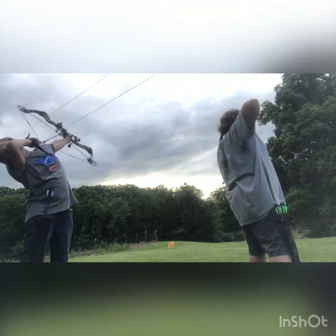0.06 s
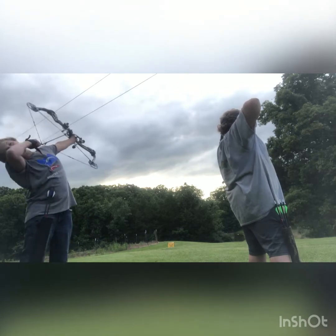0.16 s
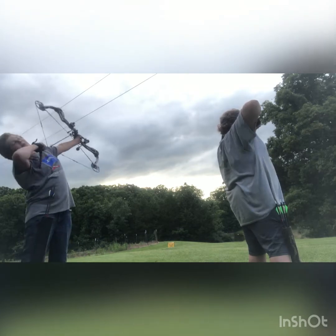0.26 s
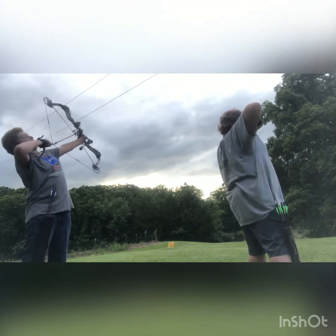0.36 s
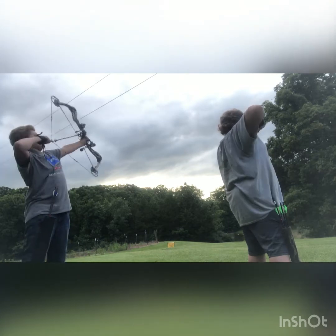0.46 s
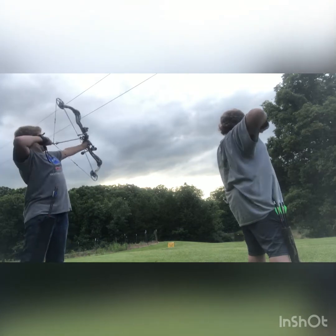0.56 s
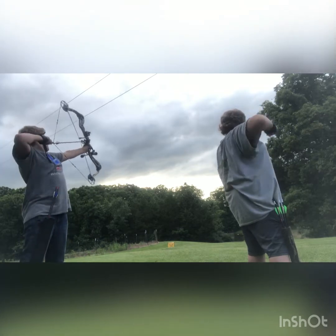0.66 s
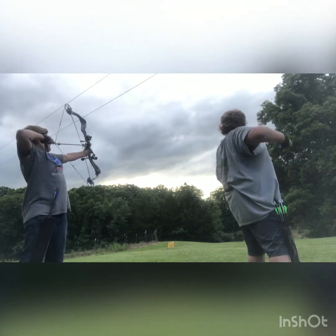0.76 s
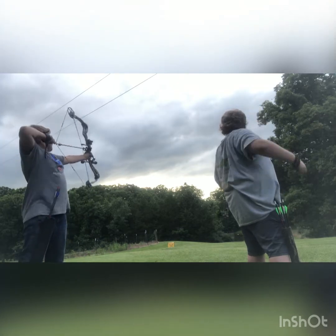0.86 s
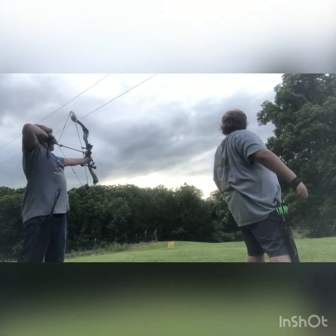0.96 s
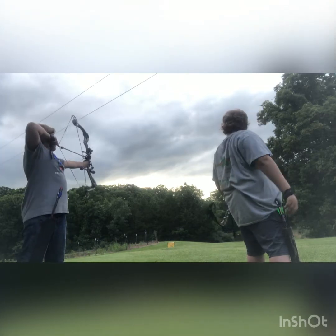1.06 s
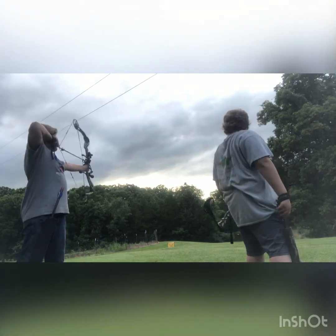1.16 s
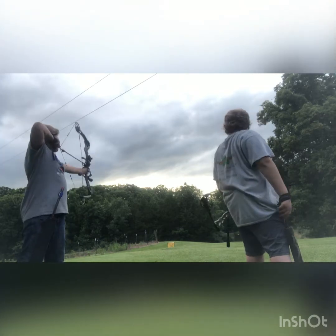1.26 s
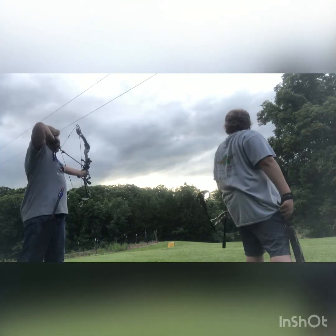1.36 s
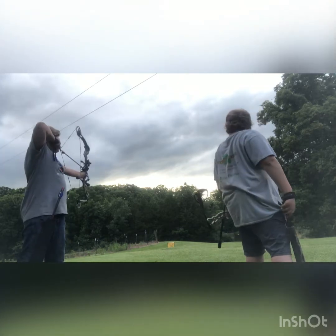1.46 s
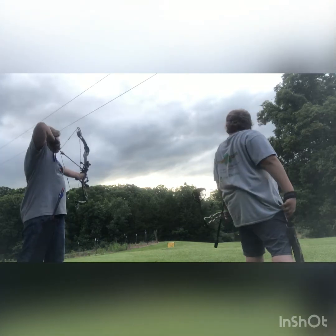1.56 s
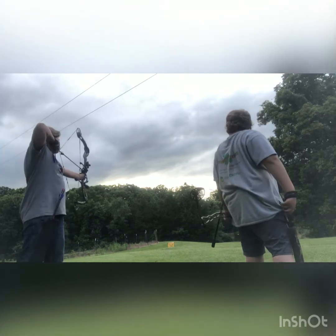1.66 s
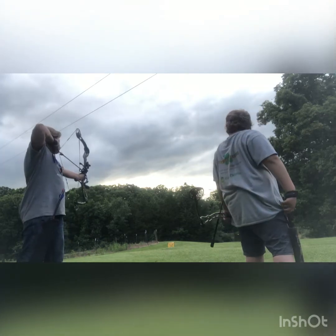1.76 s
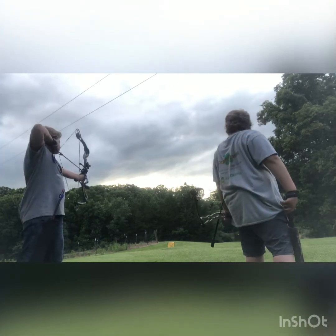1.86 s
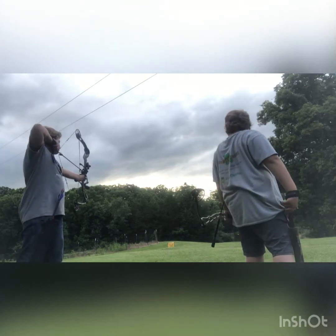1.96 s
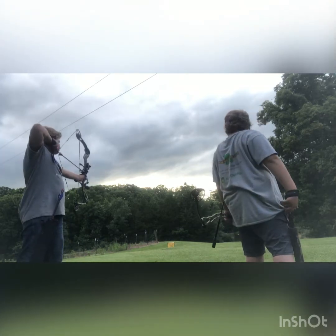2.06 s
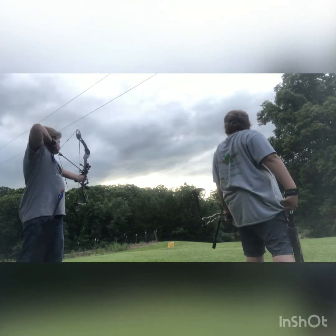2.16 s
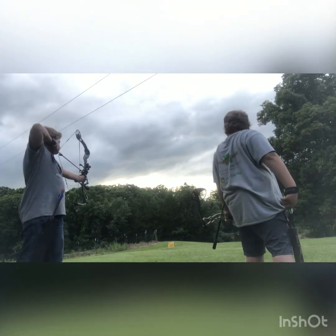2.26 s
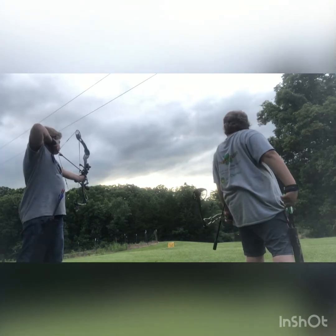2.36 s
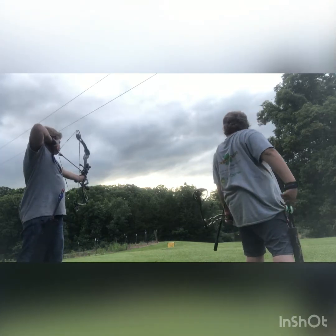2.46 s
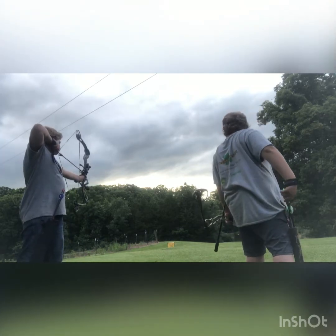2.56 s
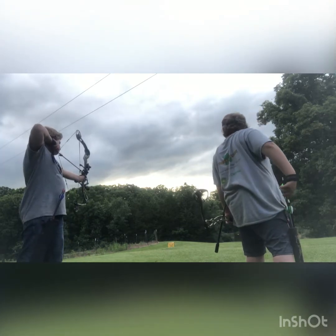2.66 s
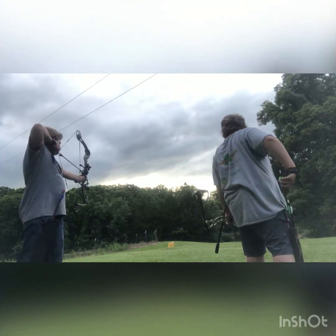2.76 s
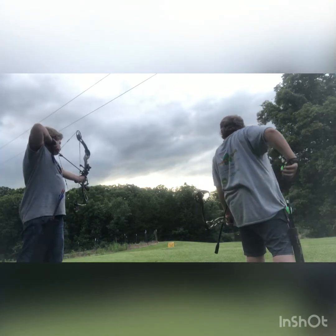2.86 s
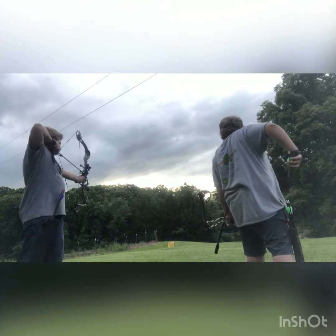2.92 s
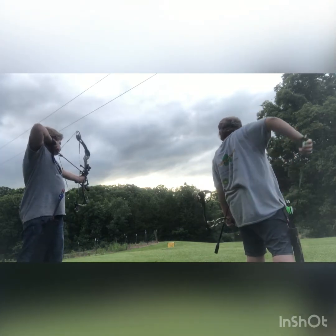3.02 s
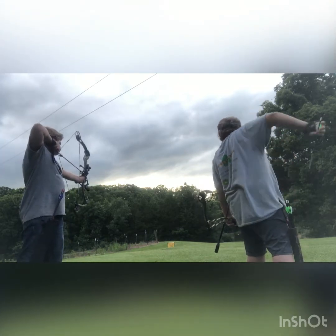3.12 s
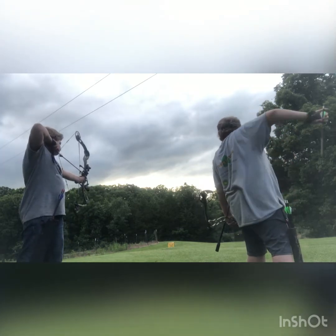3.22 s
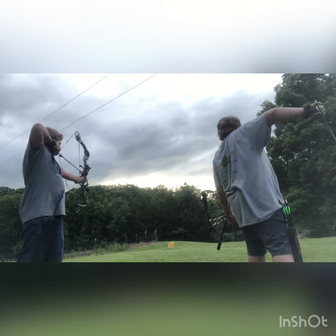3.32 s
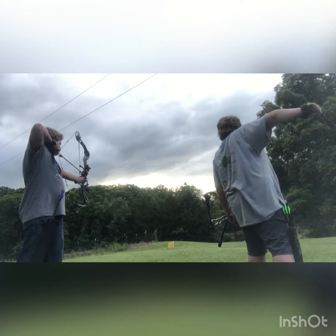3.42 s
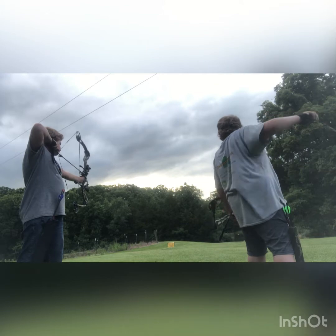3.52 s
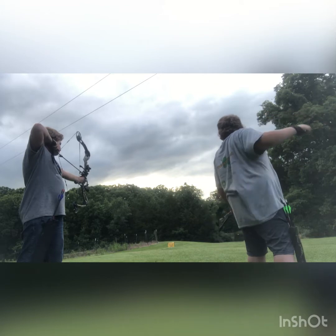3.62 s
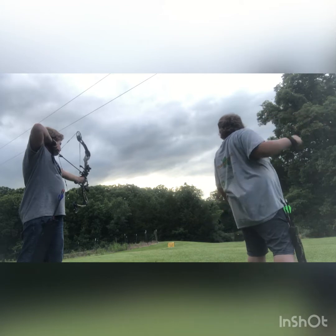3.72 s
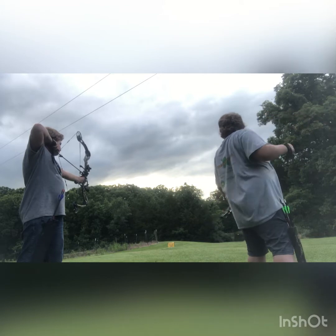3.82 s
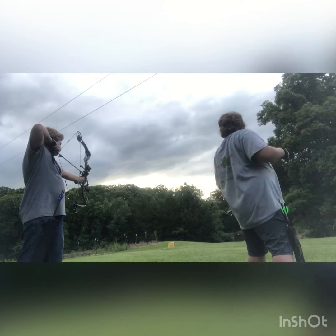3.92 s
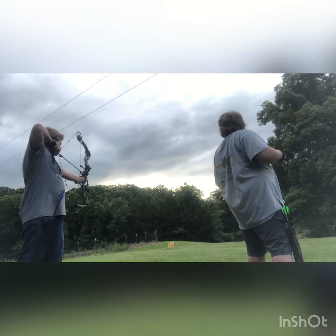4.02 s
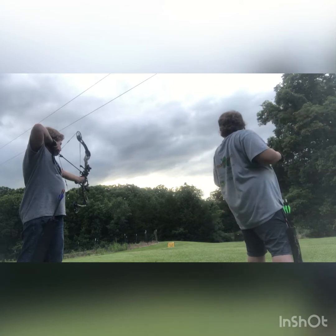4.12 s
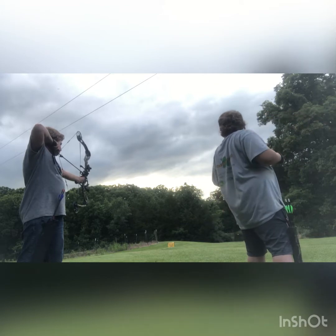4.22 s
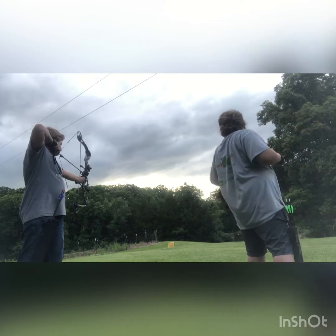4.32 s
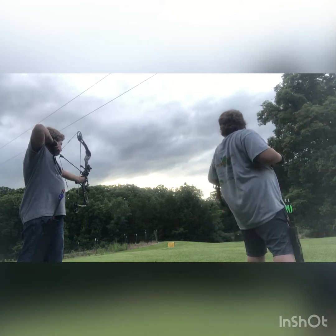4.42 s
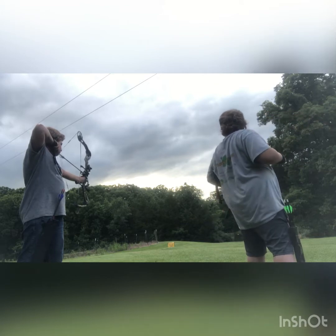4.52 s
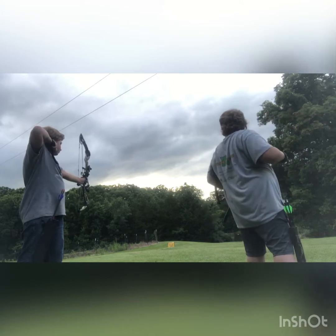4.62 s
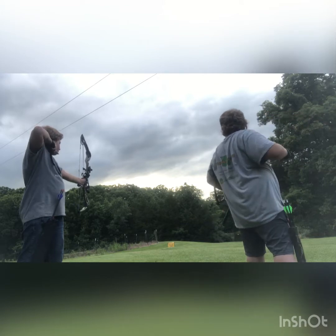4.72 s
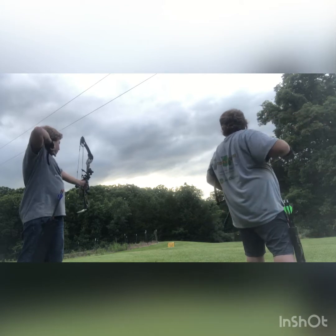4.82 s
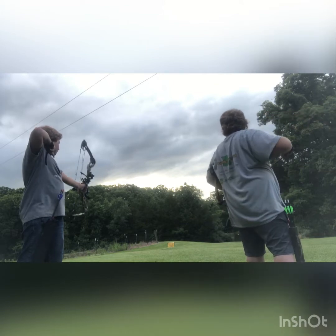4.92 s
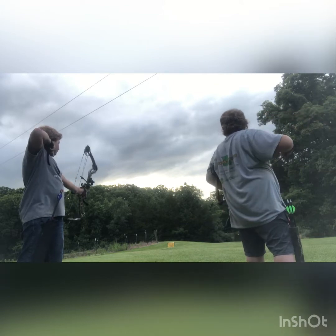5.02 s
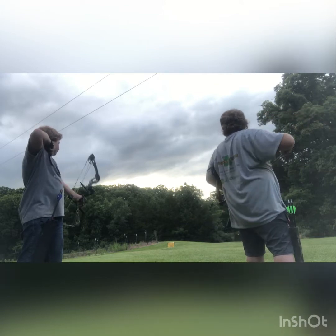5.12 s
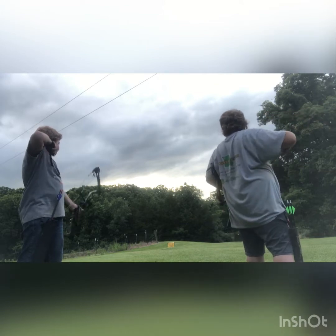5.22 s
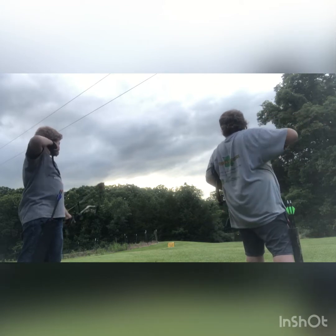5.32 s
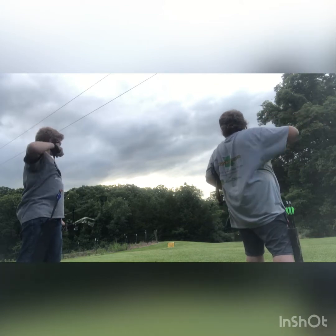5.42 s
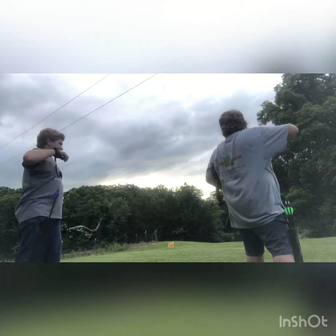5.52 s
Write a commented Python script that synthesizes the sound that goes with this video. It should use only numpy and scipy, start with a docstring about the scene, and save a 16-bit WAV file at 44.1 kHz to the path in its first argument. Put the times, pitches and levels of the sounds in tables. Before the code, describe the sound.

Very faint wind and an insect haze run throughout on an open field. At about 0.1 seconds a nearby compound bow releases with a thump and short ring. At 0.5 seconds the arrow hits a distant target with a loud crack and low thud, echoing lightly off trees. Hollow arrow shafts rattle around 1.1 seconds, followed by scattered ticks and a faint sleeve rustle. At 2.1 seconds a bouncing knock leaves a bow humming briefly. From 2.3 to 2.9 seconds an arrow scrapes softly out of a quiver, with clicks near 2.4 and 3.1. Faint birds whistle and chirp between 2.1 and 3.3 seconds. After a lull, a second bow fires with a sharp snap at 4.6 seconds. Its arrow strikes at 4.9 with a crack and heavy thump, the loudest sound. Light clicks and faint chirps follow until about 5.5 seconds.

```python
"""Two compound bows on a mown field

Each release ticks, slams the cams into their stops and rings the frame. A third of a second later the
arrow cracks into the far target, a thump follows along the ground and the tree line answers. Between
the shots arrows rattle and one scrapes out of a quiver. Birds whistle over faint wind and insects."""
import sys
import numpy as np
from scipy import signal
from scipy.fft import rfft, irfft, next_fast_len
from scipy.io import wavfile
from scipy.ndimage import map_coordinates

SR = 44100
rng = np.random.default_rng(int(sys.argv[2]) if len(sys.argv) > 2 else 0)


def persist_wave(psi):
    """Save psi, clipped to +-1, as 16-bit WAV."""
    counts = np.round(np.clip(psi, -1, 1) * 32767).astype(np.int16)
    wavfile.write(sys.argv[1], SR, np.atleast_2d(counts).T)


N = 246078
T = np.arange(N) / SR

# Target thump. Each row: frequency in Hz, density in dB.
THUMP_SPECTRUM = [(20, -56), (50, -24), (85, -28), (140, -10), (205, 0.5), (280, 0), (370, 1), (470, 1),
                  (600, -8), (800, -22), (1200, -49), (2500, -96.5)]


def amp(db):
    """Decibels to gain."""
    return 10 ** (np.asarray(db) / 20)


def unit(x):
    """Scale to rms 1."""
    return x / np.sqrt(np.mean(x ** 2) + 1e-20)


def along(points, hz):
    """Interpolate (Hz, value) points on a log frequency axis."""
    knots_hz, values = np.transpose(points)
    return np.interp(np.log(hz + 1), np.log(knots_hz), values)


def filtered(x, response):
    """Filter x by response(hz)."""
    size = next_fast_len(len(x) + 8192)
    return irfft(rfft(x, size) * response(np.fft.rfftfreq(size, 1 / SR)), size)[:len(x)]


def noise(spectrum, size=N, tilt_db=0):
    """Coloured noise of rms 1, tilted by tilt_db per octave above 500 Hz."""
    def response(hz):
        return amp(along(spectrum, hz) + tilt_db * np.log2(np.maximum(hz, 500) / 4000))
    return unit(filtered(rng.standard_normal(size), response))


def wobble(rate_hz):
    """Smooth random curve, rate_hz knots a second."""
    return map_coordinates(rng.standard_normal(int(N * rate_hz / SR) + 4), [T * rate_hz])


def fade(t, t60_s):
    """Exponential decay from t = 0."""
    return np.exp(-np.log(1000) * np.maximum(t, 0) / t60_s)


def onset(t, rise_s):
    """Exponential rise from 0 towards 1."""
    return 1 - np.exp(-t / rise_s)


def swell(start_s, length_s, attack_s, release_s):
    """Trapezoid envelope."""
    return np.clip(np.minimum((T - start_s) / attack_s, (start_s + length_s - T) / release_s), 0, 1)


def add(out, start_s, x):
    """Mix x into out from start_s."""
    start = round(start_s * SR)
    out[start:start + len(x)] += x[:N - start]


def ring(modes, rise_s, scatter_db, tilt_db=0):
    """Damped modes (Hz, dB, t60 s), struck with slightly random strengths, tilted per octave."""
    t = T[:SR]
    tones = np.zeros(SR)
    for k, (hz, db, t60_s) in enumerate(modes):
        gain = amp(db + scatter_db * rng.standard_normal() + tilt_db * np.log2(hz / modes[0][0]))
        tones += (-1) ** k * gain * fade(t, t60_s) * np.sin(2 * np.pi * hz * t)
    return tones * onset(t, rise_s)


def air():
    """One breeze drives a low rumble and a hiss of leaves, under an even haze of insects."""
    # Each row: frequency in Hz, density in dB.
    wind_spectrum = [(15, -80), (25, -31.5), (70, -3), (108, -5.5), (134, -3), (242, -10.5), (270, -13.5),
                     (439, -20), (516, -21.5), (775, -27), (936, -27.5), (1330, -31), (1790, -33),
                     (5570, -29.5), (16000, -46)]
    insect_spectrum = [(2500, -27), (4000, -10), (5800, -0.5), (7600, -3), (8400, -7), (12000, -11),
                       (16000, -16)]
    # Each row: time in seconds, relative strength in dB.
    breeze = [(0, -60), (.6, -60.5), (2.0, -62.5), (2.5, -63), (3.0, -62.5), (3.7, -64.5), (4.7, -63.5),
              (5.58, -61)]
    strength_db = np.interp(T, *np.transpose(breeze))
    gust_db = strength_db - strength_db.mean()
    split_hz, leaves_top_hz = 480, 3500
    low = filtered(noise(wind_spectrum), lambda hz: 1 / np.sqrt(1 + (hz / split_hz) ** 8))
    high = filtered(noise(wind_spectrum), lambda hz:
                    (1 - 1 / (1 + (hz / split_hz) ** 4)) / np.sqrt(1 + (hz / leaves_top_hz) ** 4))
    rumble = amp(-62 + gust_db + 0.9 * wobble(7.2)) * unit(low)
    leaves = amp(-70 + 1.07 * gust_db) * unit(high)
    insects = amp(-73.5 + 0.3 * wobble(3.4)) * noise(insect_spectrum)
    return rumble + leaves + insects


def whistling_bird():
    """Pure notes slide to a pitch, sag and linger among the trees."""
    # Each row: start and length in seconds, first and held pitch in Hz, relative level in dB.
    whistles = [(2.088, 0.252, 3880, 3734, -62), (2.466, 0.15, 3210, 3310, -59.5),
                (2.645, .125, 3240, 3420, -58.5), (2.917, 0.12, 3185, 3335, -59),
                (3.095, 0.2, 3230, 3605, -56.5), (4.665, 0.081, 3520, 3580, -61)]
    sag_hz_per_s, waver = 790, 0.00505
    out = np.zeros(N)
    for start_s, length_s, first_hz, held_hz, db in whistles:
        glide_s = 0.6 * length_s
        glide = np.sin(np.pi / 2 * np.clip((T - start_s) / glide_s, 0, 1))
        sag_hz = sag_hz_per_s * np.clip(T - start_s - glide_s, 0, length_s)
        pitch_hz = first_hz + (held_hz - first_hz) * glide - sag_hz
        level = swell(start_s, length_s, 0.023, 0.026) * amp(db - 3.5 + 1.1 * wobble(50))
        out += level * np.sin(2 * np.pi * np.cumsum(pitch_hz * (1 + waver * wobble(80))) / SR)
    wood = fade(T[:SR], t60_s=0.97) * rng.standard_normal(SR)
    return out + amp(-10) * signal.fftconvolve(out, wood / np.linalg.norm(wood))[:N]


def chirping_bird():
    """Brief, husky, falling chirps."""
    # Each row: centre in seconds, pitch in Hz, relative level in dB.
    chirps = [(2.59, 3490, -57.5), (2.668, 3270, -57), (2.83, 3000, -63), (3.013, 2820, -62),
              (5.203, 5050, -65), (5.274, 3360, -60), (5.353, 3280, -60), (5.398, 2320, -65),
              (5.433, 3050, -59), (5.514, 2770, -63.5)]
    sigma_s = 0.0065
    husk = 1 + 0.06 * wobble(600)
    out = np.zeros(N)
    for centre_s, hz, db in chirps:
        sigmas = np.clip((T - centre_s) / sigma_s, -5, 5)
        pitch_hz = hz * husk * (1 - 0.012 * sigmas)
        out += amp(db + 3.5) * np.exp(-sigmas ** 2 / 2) * np.sin(2 * np.pi * np.cumsum(pitch_hz) / SR)
    return out


def field(x):
    """Grass scatters near sounds at once, the side trees answer later; leaves blur every tone."""
    # Each row: lower and upper band edge in Hz, tree echo in dB.
    bands = [(397, 1200, -42.5), (1230, 2900, -32.5), (3110, 4150, -23.5), (4220, 6900, -26.5),
             (6700, 12000, -35)]
    t = T[:SR]
    grass_decay = fade(t, 0.29) ** 2
    grass_power = amp(-20.5) ** 2 * grass_decay / grass_decay.sum()
    tree_decay = (fade(t, 0.51) * onset(t, 0.0046)) ** 2
    tree_power, out = np.zeros(N), np.zeros(N)
    add(tree_power, 0.1, tree_decay / tree_decay.sum())
    for low_hz, high_hz, echo_db in bands:
        band = signal.butter(2, [low_hz, high_hz], "band", fs=SR, output="sos")
        power_response = grass_power + amp(echo_db) ** 2 * tree_power[:SR]
        scattered = signal.fftconvolve(signal.sosfilt(band, x) ** 2, power_response)[:N]
        out += np.sqrt(np.abs(scattered)) * unit(signal.sosfilt(band, rng.standard_normal(N)))
    return out


def slips(spectrum):
    """Friction noise: tiny, irregular slips."""
    return unit(noise(spectrum) * amp(3.4 * wobble(350) + 1.9 * wobble(45)))


def rubbing():
    """A sleeve shifts; a shaft slides from the quiver, sounding its modes and rasping on the rim."""
    # Cloth and shaft friction, then the rim. Each row: frequency in Hz, density in dB.
    rub_spectra = [
        [(350, -45), (600, -15), (1330, -10.5), (3190, -7.5), (3950, -18), (5110, -5), (5610, -12),
         (6420, -11.5), (15000, -34)],
        [(350, -18), (600, -9), (765, -22), (1030, -8), (1380, -8), (1500, -20), (1670, -4.5), (2250, -6.5),
         (3020, -7), (3320, -9), (3950, -16), (4650, -4.5), (6600, -44), (8870, -20.5), (15000, -44)],
    ]
    rim_spectrum = [(2500, -24), (4200, -13), (4700, 2), (5300, 7.5), (6200, -16), (8000, -5), (9100, -8),
                    (11000, -12), (15000, -26)]
    # Each row: centre and half-width in seconds, relative shaft and rim levels in dB.
    pulls = [(2.342, 0.019, -72, -66), (2.522, 0.018, -63, -68.5), (2.60, 0.034, -64.5, -81),
             (2.743, 0.065, -54.5, -68.5), (2.907, 0.026, -55.5, -59.5)]
    # Each row: frequency and bandwidth in Hz, gain in dB.
    shaft_modes = [(1634, 110, 5), (2390, 96, -3), (3330, 240, -2.5), (3640, 18, -3), (4620, 83, -4),
                   (5000, 55, -12), (8800, 110, -11)]

    def shaft_response(f):
        return sum(amp(db) * 1j * f * width_hz / (hz * hz - f * f + 1j * f * width_hz)
                   for hz, width_hz, db in shaft_modes)

    cloth_spectrum, scrape_spectrum = rub_spectra
    shaft_level, rim_level = np.zeros(N), np.zeros(N)
    for centre_s, width_s, shaft_db, rim_db in pulls:
        speed = np.exp(-((T - centre_s) / width_s) ** 2 / 2)
        shaft_level += amp(shaft_db) * speed
        rim_level += amp(rim_db) * speed
    singing = unit(filtered(rng.standard_normal(N) * amp(2.4 * wobble(200)), shaft_response))
    sleeve = amp(-67) * swell(1.28, 0.46, attack_s=0.1, release_s=0.075) * slips(cloth_spectrum)
    shaft = shaft_level * (amp(-3) * slips(scrape_spectrum) + amp(-5.5) * singing)
    rim = rim_level * unit(noise(rim_spectrum) * amp(7.3 * wobble(300)))
    return sleeve + shaft + rim


def arrow_rattle():
    """Hollow shafts click, rebound and knock on the riser; the handled bows hum."""
    # Each row: frequency in Hz, density in dB.
    shaft_spectrum = [(400, -27.5), (850, -12.5), (1350, -10.5), (1700, -5.5), (2200, -1), (3200, -2),
                      (4100, -4), (5200, 1), (7000, -4.5), (9500, -9), (13000, -18.5), (16000, -29)]
    # Each row: start in seconds, relative level in dB, ring in Hz, tilt in dB/octave, t60 in seconds.
    clicks = [(1.0957, -32.5, 5330, 0.7, 0.049), (1.1127, -30, 6130, -0.2, 0.038),
              (1.1233, -32.5, 3320, -4.5, 0.031), (1.1339, -37, 3210, -6, .04),
              (1.1537, -41.5, 6260, -5.5, 0.065), (1.1785, -28, 5320, 0.4, .026),
              (1.211, -44, 3220, -3.5, 0.042), (1.229, -46.5, 2460, -4, .022),
              (1.3363, -41.5, 3000, -4, .022), (1.457, -46.5, 5200, -3.5, 0.023),
              (1.5536, -40, 3400, -6.5, 0.023), (1.8345, -41, 3640, -3.5, 0.019),
              (1.911, -42, 5240, -1, 0.042), (2.448, -31, 1780, -5, 0.019), (3.0679, -32, 5010, 2, 0.022),
              (3.0718, -35, 1630, -0.5, .04), (3.469, -47.5, 3280, 0.5, 0.019),
              (4.9952, -42, 2440, 0, 0.019), (5.2341, -36, 2540, -1.5, 0.013),
              (5.3037, -41, 2230, -5.5, 0.017)]
    # Each row: start in seconds, relative level in dB, tilt in dB/octave, number of contacts.
    knocks = [(1.115, -46, -3.5, 1), (2.147, -34.5, -2, 4), (2.449, -48.5, 4, 1), (3.071, -47, -2, 1)]
    # Each row: frequency in Hz, relative level in dB, t60 in seconds.
    riser_modes = [(508, -24, 0.074), (840, -9.5, 0.063), (930, -14, 0.1), (1120, -5, 0.038),
                   (1270, -8, 0.08), (1522, 4, 0.026), (1637, 0.5, 0.053), (2346, -1.5, 0.026),
                   (3210, 1.5, 0.01), (4550, 2.5, 0.013)]
    # Each row: start in seconds, frequency in Hz, level in dB, t60 in seconds.
    hums = [(.045, 65, -42, 0.11), (1.179, 298, -64, 2.1), (2.15, 174.7, -50, 0.82)]
    rebound_s, first_flight_s, flight_ratio = 0.006, 0.043, 0.635
    out, t = np.zeros(N), T[:SR // 8]
    for start_s, db, hz, tilt_db, t60_s in clicks:
        contact = fade(t, t60_s) * onset(t, 0.00036)
        tone = amp(-2) * np.sin(2 * np.pi * hz * t)
        add(out, start_s, amp(db - 5.5) * contact * (noise(shaft_spectrum, len(t), tilt_db) + tone))
        add(out, start_s + rebound_s, amp(db - 15.5) * contact * noise(shaft_spectrum, len(t), tilt_db))
    for start_s, db, tilt_db, contacts in knocks:
        for k in range(round(contacts)):  # each bounce sooner, softer, duller
            at_s = start_s + first_flight_s * (1 - flight_ratio ** k) / (1 - flight_ratio)
            blow_db, slope_db = db - 4.5 * k, tilt_db - 1.7 * k
            riser = ring(riser_modes, rise_s=0.0006, scatter_db=1.5, tilt_db=slope_db)
            tick = fade(t, 0.015) * noise(shaft_spectrum, len(t), slope_db - 2.5)
            add(out, at_s, amp(blow_db) * riser)
            add(out, at_s, amp(blow_db - 11) * tick)
    for start_s, hz, db, t60_s in hums:
        add(out, start_s, ring([(hz, db, t60_s)], rise_s=0.0028, scatter_db=0.8))
    return out


def crack(spectrum, size=2048):
    """Minimum-phase pressure spike of peak 1."""
    cepstrum = irfft(np.log(amp(along(spectrum, np.fft.rfftfreq(size, 1 / SR)))))
    cepstrum[1:size // 2] *= 2
    cepstrum[size // 2 + 1:] = 0
    spike = irfft(np.exp(rfft(cepstrum)))
    return spike / np.abs(spike).max()


def thump(lead_s, size=8192):
    """The target's push, lead_s in, peak 1. Low tones creep over the turf: a falling sweep."""
    # Each row: frequency in Hz, delay in seconds.
    ground_lag = [(100, 0.0119), (170, 0.0092), (240, 0.0048), (340, 0.0035), (480, 0.0038), (700, 0.00092)]
    hz = np.fft.rfftfreq(size, 1 / SR)
    phase = 2 * np.pi * np.cumsum(lead_s + along(ground_lag, hz)) * SR / size
    wave = irfft(amp(along(THUMP_SPECTRUM, hz)) * np.exp(-1j * phase))
    return wave / np.abs(wave).max()


def tree_echo(spectrum, t):
    """The near edge answers, then the deep wood, where long waves slip through the leaves."""
    edge = fade(t - 0.035, 0.27) * noise(spectrum, len(t)) * amp(1.7 * wobble(128)[:len(t)])
    foliage = filtered(noise(spectrum, len(t)), lambda hz: hz / np.hypot(hz, 450))
    wood = amp(-11) * fade(t, 1.82) * foliage
    return onset(t, 0.0045) * (edge + wood)


def target():
    """Each arrow cracks, burrows in and thumps; uneven turf and the trees behind scatter the sound."""
    # Each row: time in seconds, crack, thump and echo levels in dB, echo delay in seconds.
    impacts = [(.4939, -11, -17, -46, .0305), (4.9179, -8.5, -6.5, -39, .033)]
    # One spectrum per arrow. Each row: frequency in Hz, density in dB.
    crack_spectra = [
        [(500, -12.5), (1000, -4), (2400, -7), (3700, 2.5), (4700, 2), (7000, -11.5), (12000, -21.5),
         (16000, -31)],
        [(500, -1.5), (1100, 5.5), (1900, 3.5), (2400, -3), (3000, 1), (4000, -11), (5500, -7), (8000, -19.5),
         (11000, -18), (16000, -35)],
    ]
    echo_spectra = [
        [(76, -46), (130, -5), (294, 0), (403, -9.5), (600, -15), (676, -23), (825, -7), (1110, -10.5),
         (1440, -7), (2230, -15.5), (3880, -10), (4830, -11.5), (15000, -49)],
        [(76, -18.5), (130, -7), (193, 1.5), (380, -3.5), (600, -15.5), (718, -16), (1160, -15), (1470, -12),
         (2410, -12), (6380, -34), (7940, -34.5), (8950, -46.5), (15000, -51)],
    ]
    lead_s = 0.04
    out, t = np.zeros(N), T[:2 * SR]
    for impact, crack_spectrum, echo_spectrum in zip(impacts, crack_spectra, echo_spectra):
        hit_s, crack_db, thump_db, echo_db, delay_s = impact
        burrow = fade(t, 0.023) * noise(crack_spectrum, len(t))
        turf = fade(t, 0.1) * onset(t, 0.0052) * noise(THUMP_SPECTRUM, len(t))
        add(out, hit_s, amp(crack_db) * crack(crack_spectrum))
        add(out, hit_s, amp(crack_db - 25.5) * burrow)
        add(out, hit_s - lead_s, amp(thump_db) * thump(lead_s))
        add(out, hit_s + 0.00345, amp(thump_db - 27) * turf)
        add(out, hit_s + delay_s, amp(echo_db) * tree_echo(echo_spectrum, t))
    return out


def release(contacts, spectrum, modes, ring_start_s, ring_rise_s):
    """The string drives the cams into their stops; hard parts chatter and the frame rings on."""
    out = np.zeros(N)
    t = T[:SR // 4] - 0.03  # zero at the force peak
    for peak_s, db, rise_s, t60_s, tilt_db in contacts:
        force = np.exp(np.minimum(t, 0) / rise_s) * fade(t, t60_s)
        add(out, peak_s + t[0], amp(db) * force * noise(spectrum, len(t), tilt_db))
    add(out, ring_start_s, ring(modes, ring_rise_s, scatter_db=1.17))
    return out


def bows():
    """Two bows, one release each."""
    # Trigger, string, cams and stops.
    # Each row: peak time in seconds, level in dB, rise and t60 in seconds, tilt in dB/octave.
    contacts_a = [(.1195, -35.5, 0.001, 0.037, -1), (.1408, -21, 0.002, 0.027, -1.5),
                  (.144, -32.5, 0.0015, 0.13, -6), (.1562, -38, .0004, 0.044, 10),
                  (.1735, -41.5, .0004, 0.02, 6)]
    contacts_b = [(4.542, -51, 0.0017, 0.06, -1.5), (4.560, -40, 0.0023, .02, -1.5),
                  (4.5627, -20.5, 0.00011, 0.052, 5), (4.5672, -18, 0.00087, 0.026, -1.5),
                  (4.5802, -55, .0015, .025, 3)]
    # Each row: frequency in Hz, density in dB.
    clack_a = [(240, -34), (400, -16.5), (676, -4.5), (960, -23.5), (1300, -10.5), (2500, -11), (3400, -4),
               (5000, -12), (7000, -8.5), (8000, -18), (12700, -22.5), (16000, -34)]
    clack_b = [(240, -30), (400, -22), (719, -3.5), (906, -8), (1130, -31), (1290, -11), (1490, -25),
               (2050, -7.5), (2800, -12), (3070, -11), (3310, -11.5), (4510, -12.5), (5870, -18.5),
               (10700, -21), (16000, -35)]
    # Limbs, riser and cables. Each row: frequency in Hz, level in dB, t60 in seconds.
    modes_a = [(70, -35.5, 0.135), (195, -23, 0.055), (411, -33, 0.13), (481, -30, 0.24), (593, -37, 0.13),
               (646, -25, .07), (730, -36, 0.075), (844, -33, 0.07), (1236, -32, 0.069)]
    modes_b = [(135, -41, 0.071), (215, -43.5, 0.086), (418, -35.5, 0.13), (570, -24, 0.028),
               (636, -22, 0.041), (696, -17, 0.038), (781, -29, 0.16), (935, -33.5, 0.11),
               (1740, -32, 0.053), (2145, -24.5, 0.023), (3070, -9.5, 0.019), (3585, -51, 0.051),
               (7070, -37, 0.057), (10060, -27, 0.033)]
    first = release(contacts_a, clack_a, modes_a, ring_start_s=0.1415, ring_rise_s=0.011)
    second = release(contacts_b, clack_b, modes_b, ring_start_s=4.5655, ring_rise_s=0.0012)
    return first + second


def scene():
    """Bows, gear and birds with their field echo, plus the far target and the air; mono."""
    near = bows() + arrow_rattle() + rubbing() + whistling_bird() + chirping_bird()
    return (near + field(near) + target() + air())[None]


def record(dry):
    """The microphone sheds the deepest bass and cuts off at its band limit."""
    low_hz, top_hz, edge_hz = 36, 16000, 300
    thin = signal.sosfilt(signal.butter(2, low_hz, "high", fs=SR, output="sos"), dry)
    return np.array([filtered(x, lambda hz: np.clip((top_hz - hz) / edge_hz + 0.5, 0, 1)) for x in thin])


dry = scene()
out = record(dry)
persist_wave(out)
```